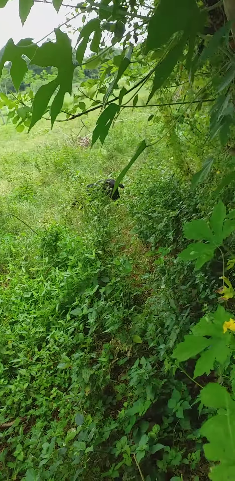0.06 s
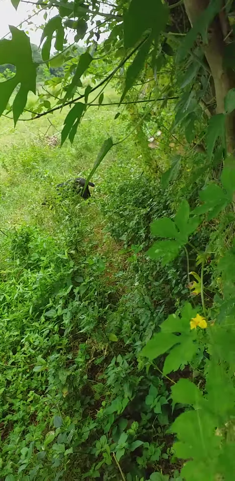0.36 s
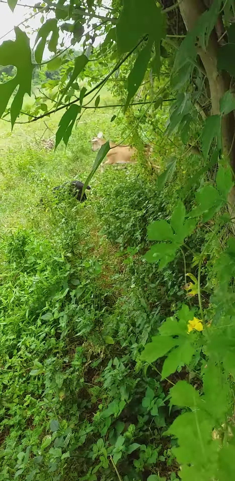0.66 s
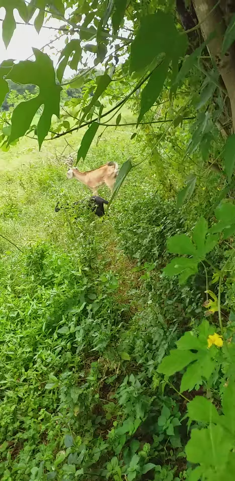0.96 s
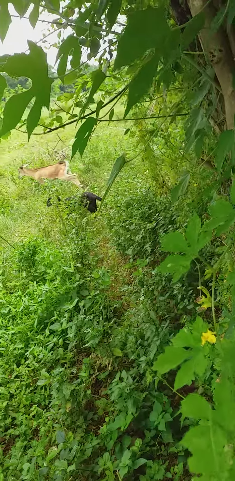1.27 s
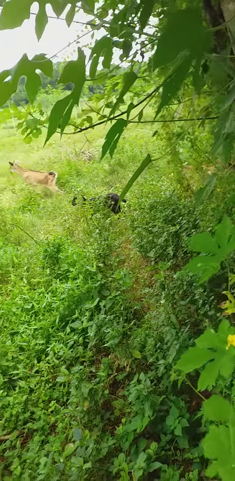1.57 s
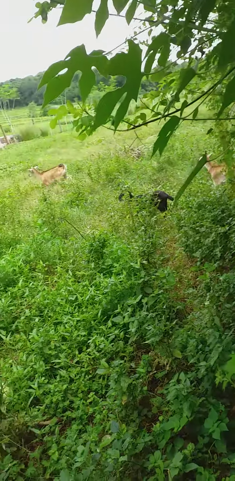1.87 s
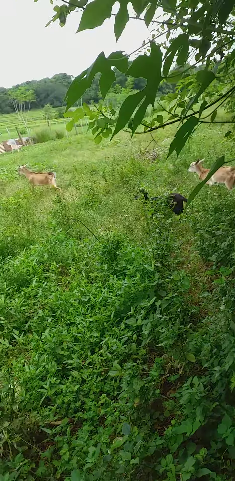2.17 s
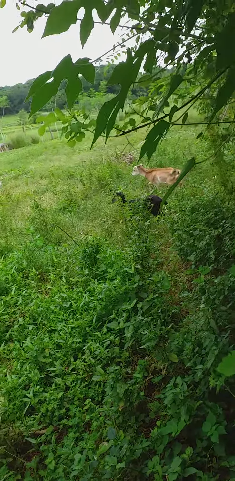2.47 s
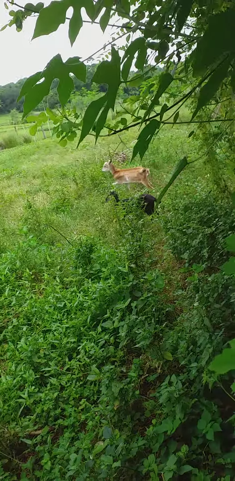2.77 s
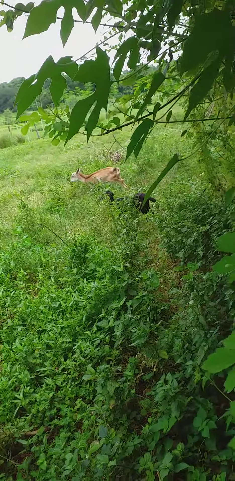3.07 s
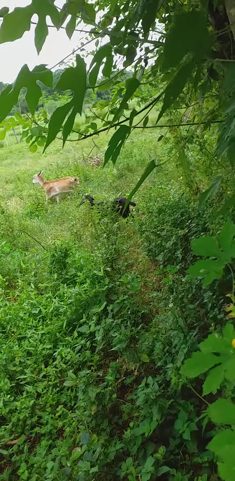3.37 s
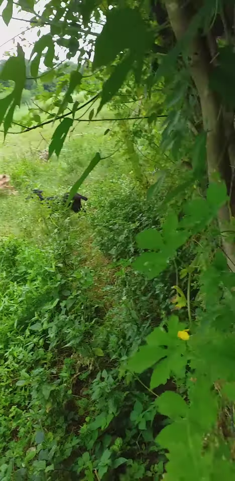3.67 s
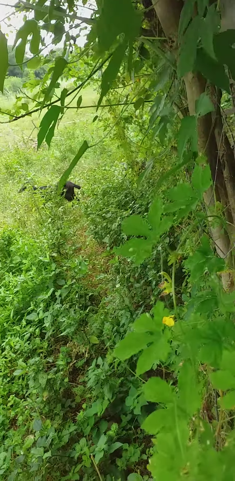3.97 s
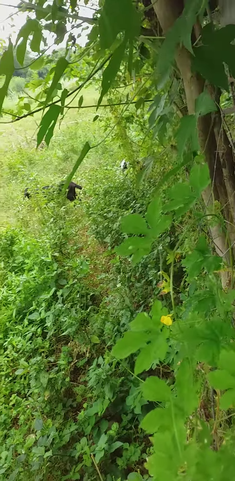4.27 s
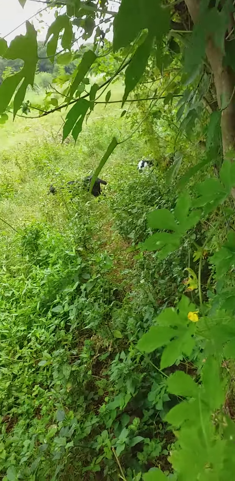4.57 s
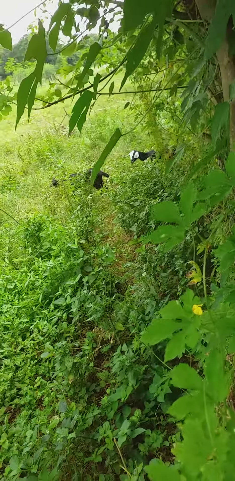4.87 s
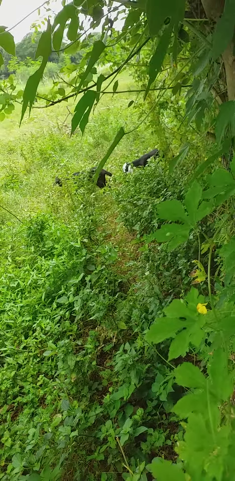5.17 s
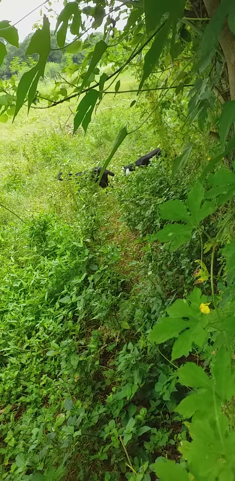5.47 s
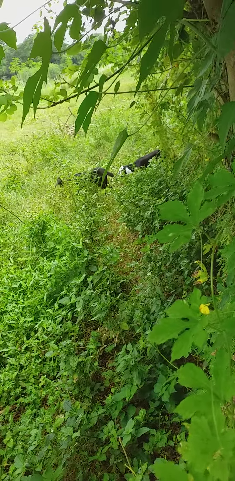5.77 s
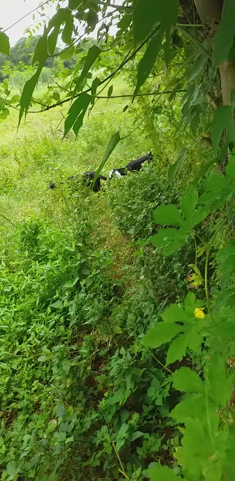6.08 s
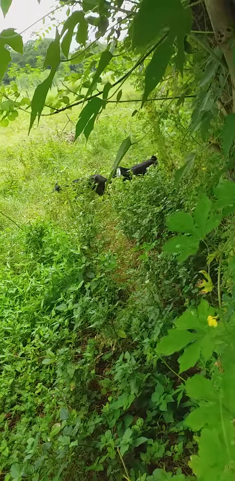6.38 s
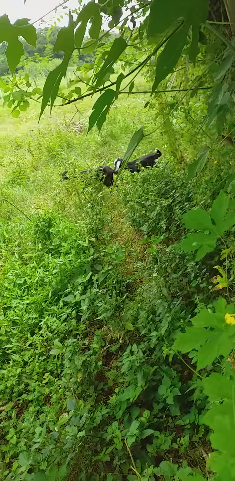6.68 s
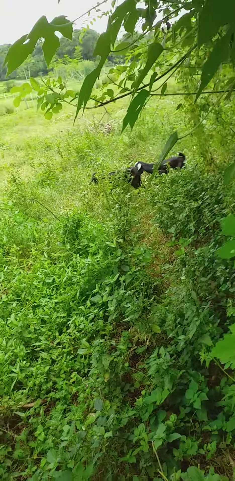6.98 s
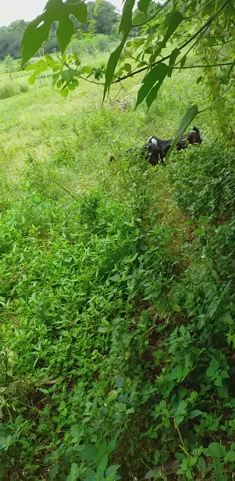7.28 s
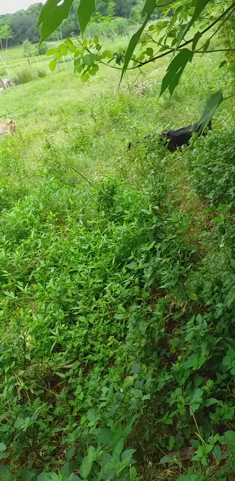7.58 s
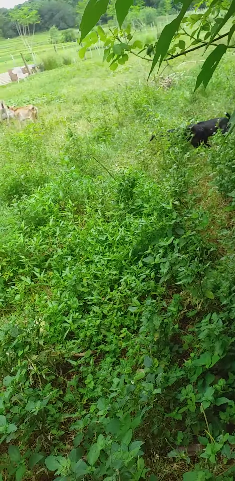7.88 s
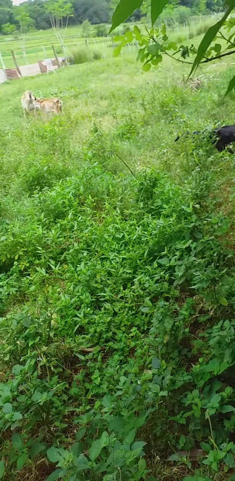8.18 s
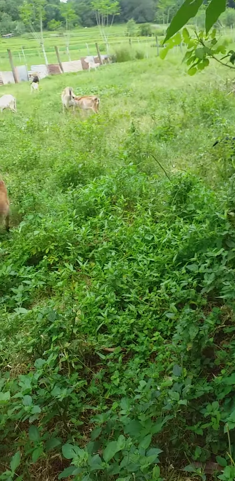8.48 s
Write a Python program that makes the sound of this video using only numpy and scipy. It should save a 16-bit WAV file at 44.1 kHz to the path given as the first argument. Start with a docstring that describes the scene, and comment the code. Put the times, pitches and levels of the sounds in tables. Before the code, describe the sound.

Three wavering bleats from a goat kid, the last one quieter, over soft outdoor air, leaf crackles and faint bird chirps.

```python
"""A pasture opens with low moving air and hissing grass; leaves tick and rustle, puffs bump the microphone.
Small birds chirp, then at 1.4 s a goat kid bleats loudly: its voice box shakes, making about eleven throbs
a second, and trees scatter the sound back. Far animals call thinly from 2.4 s. A second bleat comes at
3.4 s, while a stem knocks on the microphone. Near 6 s the leaves are busiest, and faint insects and a far
hum swell and fade. After one more chirp, a quieter third bleat follows at 7.4 s."""
import sys
import numpy as np
from scipy import signal
from scipy.fft import rfft, irfft, next_fast_len
from scipy.io import wavfile
from scipy.ndimage import map_coordinates

SR = 44100
rng = np.random.default_rng(int(sys.argv[2]) if len(sys.argv) > 2 else 0)


def wav_record(signal):
    """Record a signal, one row per channel, as 16-bit PCM in the file named by sys.argv[1]."""
    frames = np.transpose(np.atleast_2d(signal))
    bounded = np.clip(frames, -1, 1)
    # unit amplitude maps onto the largest positive 16-bit level
    quanta = np.round(bounded * 32767).astype(np.int16)
    wavfile.write(sys.argv[1], SR, quanta)


N = 384672
TIME = np.arange(N) / SR


def amp(db):
    """Turn decibels into a number to multiply by."""
    return 10 ** (np.asarray(db) / 20)


def unit(x):
    """Scale x to an average (rms) size of 1."""
    return x / np.sqrt(np.mean(x ** 2) + 1e-20)


def along(points, hz):
    """Read between (f/Hz, value) points, with octaves evenly spaced."""
    f, v = np.transpose(points)
    return np.interp(np.log(hz + 1), np.log(f + 1), v)


def wobble(rate, size):
    """A smooth curve through `rate` random values a second."""
    knots = rng.standard_normal(int(size * rate / SR) + 4)
    return map_coordinates(knots, [np.arange(size) * rate / SR])


def coloured(x, spectrum):
    """Give x a tone colour: turn its lows and highs up or down by (f/Hz, level/dB) points."""
    m = next_fast_len(len(x) + 8192)
    return irfft(rfft(x, m) * amp(along(spectrum, np.fft.rfftfreq(m, 1 / SR))), m)[:len(x)]


def noise(spectrum, size=N):
    """Noise of average size 1 with the given tone colour."""
    return unit(coloured(rng.standard_normal(size), spectrum))


def add(track, s, x):
    """Mix x into the track from time s."""
    i = max(round(s * SR), 0)
    track[i:i + len(x)] += x[:N - i]


def swell(s, width_s):
    """A bell-shaped rise and fall around time s."""
    return np.exp(-.5 * ((TIME - s) / width_s) ** 2)


def strokes(rows):
    """A loudness curve of quick rises and slower falls, from (peak t/s, level/dB, fall/s) rows."""
    out = np.zeros(N)
    for s, db, fall in rows:
        t = np.arange(max(-2 * fall, -s), 10 * fall, 1 / SR)
        rise = 0.23 * fall
        add(out, s + t[0], amp(db) * np.exp(-np.maximum(-t / rise, t / fall)))
    return out


def whistles(rows, waver):
    """Sliding, slightly unsteady tones that swell and fade."""
    out = np.zeros(N)
    for s, length, start_hz, glide, db in rows:
        u = np.linspace(0, 1, int(length * SR))
        hz = (start_hz + glide * length * u) * (1 + waver * wobble(123, len(u)))
        tone = np.sqrt(2) * np.sin(2 * np.pi * np.cumsum(hz) / SR)
        add(out, s, amp(db) * np.sin(np.pi * u) * tone)
    return out


# Tone colour of moving air: f/Hz, relative level/dB
AIR_COLOUR = [(25, -22.5), (40, -7.5), (60, 1), (120, -1.5), (200, -8), (300, -10), (500, -18), (900, -23),
              (1500, -37.5), (3000, -82)]

def air():
    """Moving air makes a low, uneven rumble."""
    return amp(-58 + 1.9 * wobble(10, N)) * noise(AIR_COLOUR)


# Tone colour of hissing grass: f/Hz, relative level/dB
GRASS_COLOUR = [(300, -24), (800, -12.5), (1100, -2), (1600, 2.5), (3000, 0), (5000, 2), (7500, 1.5),
                (8500, -7), (9600, -14), (10700, -3.5), (11500, 0), (12500, -6), (16000, -5.5)]
# Loudness of the background hiss, which dips after the first bleat and recovers: t/s, relative level/dB
HISS_LEVEL = [(0, -55), (.35, -49.5), (.6, -56.5), (1.3, -53.5), (2.1, -53), (2.6, -59.5), (3.3, -50.5),
              (4.5, -56.5), (5.3, -53.5), (5.8, -56), (7.2, -53.5), (8.2, -50.5)]

def grass():
    """Grass and leaves hiss faintly; a softer stirring drifts in and out on top."""
    drift = amp(4 * wobble(7, N) + 1.5 * wobble(300, N))
    stir_colour = [(1000, -34), (3000, -8.5), (5000, -0.5), (7000, -16.5), (9000, -18.5), (16000, -29)]
    stir = unit(drift * noise(stir_colour))
    level_db = np.interp(TIME, *np.transpose(HISS_LEVEL)) - 2.5 + 0.8 * wobble(8, N)
    return amp(level_db) * (noise(GRASS_COLOUR) + amp(-7) * stir)


# Tone colours of a dry crackle and of a thin leafy hiss: f/Hz, relative level/dB
DRY_LEAF = [(200, -22.5), (1500, -11), (3000, -8.5), (4800, 6), (7200, 1.5), (9300, -19.5),
            (12500, -8), (16000, -18.5)]
THIN_LEAF = [(3000, -24.5), (7000, -5.5), (9300, -16), (12500, -3.5), (16000, -7)]

def stray_ticks():
    """Faint ticks, dry or thin, come at random and crowd together while the leaves are stirred."""
    ticks_per_s = 34 * np.maximum(.15, swell(5.9, width_s=.9))
    dry, thin = (rng.random((2, N)) < ticks_per_s / SR) * amp(rng.uniform(-8, 4, (2, N)))
    return amp(-28) * (coloured(dry, DRY_LEAF) + coloured(thin, THIN_LEAF))


# Puffs of air: t/s, level/dB, width/s
PUFFS = [(0.247, -36, 0.0075), (0.983, -44.5, 0.04), (2.805, -43.5, 0.031), (5.65, -41.5, 0.0047),
         (6.905, -51, 0.038), (7.915, -51.5, 0.058), (8.115, -39.5, 0.026), (8.251, -43, 0.055),
         (8.612, -50, 0.065)]

def air_puffs():
    """Puffs of air hit the microphone's opening and rumble briefly."""
    level = sum(amp(db) * swell(s, width) for s, db, width in PUFFS)
    colour = [(25, -33), (55, 3), (90, 1.5), (150, -6), (260, -25.5), (600, -57), (2000, -90)]
    rumble = signal.hilbert(noise(colour))  # its abs() is the loudness at each moment
    evened = rumble.real / np.sqrt(np.abs(rumble) + .1)
    return level * unit(evened)


# Dry leaves and stems snapping: t/s, peak level/dB
SNAPS = [(0.3, -34), (0.4413, -31.5), (4.89, -27.5), (5.241, -23.5), (5.2645, -31), (5.282, -21.5),
         (5.3515, -25.5), (5.369, -20), (5.614, -33.5), (5.908, -33), (6.1895, -28), (6.5795, -33.5),
         (6.9458, -33), (8.6249, -22.5)]
# Leaves brushing past: peak t/s, level/dB, fall/s, hiss compared with crackle/dB
RUSTLES = [(.32, -57, .1, -9), (.492, -36.5, .012, -13), (2.949, -39, 0.016, -9.5),
           (3.742, -30.5, .035, -12), (4.861, -45, 0.019, -4), (5.028, -49, .07, 3.5),
           (5.189, -41.5, 0.016, -11), (5.39, -46.5, 0.066, -17), (5.984, -45, 0.0067, -14),
           (6.063, -49, 0.0074, 4), (6.192, -47, 0.014, 2), (6.945, -44, 0.032, -24), (8.23, -53, 0.067, 4),
           (8.632, -43, .035, -20)]

def leaves():
    """Brushing leaves make a crowd of tiny crackles and a thin sliding hiss; single stems snap above it."""
    shakes = [(s, db - 30, 0.031) for s, db in SNAPS]  # the leaves shake after each snap
    crackle_level = strokes([(s, db, fall) for s, db, fall, _ in RUSTLES] + shakes)
    hiss_level = strokes([(s, db + hiss_db, fall) for s, db, fall, hiss_db in RUSTLES])
    grains = rng.standard_normal(N) * amp(6 * wobble(1500, N) + 1.2 * wobble(140, N))  # uneven clumps
    out = crackle_level * unit(coloured(grains, DRY_LEAF))
    out += hiss_level * unit(coloured(grains, THIN_LEAF))
    t = np.arange(-.005, .03, 1 / SR)
    crack = (t >= 0) * amp(-60 * np.abs(t) / .015)  # drops 60 dB in 15 ms
    for s, db in SNAPS:
        snap = coloured(rng.standard_normal(len(t)) * crack, DRY_LEAF)
        add(out, s + t[0], amp(db) * snap / np.abs(snap).max())
    return out


# Bird chirps: t/s, starting f/Hz, slide/(Hz per s), level/dB
CHIRPS = [(0.888, 2850, 16000, -55), (1.015, 3400, -16000, -51), (1.084, 2935, 16000, -55.5),
          (1.278, 3026, 11000, -54), (7.033, 3960, -17000, -50)]

def birds(length_s=0.032):
    """Small birds whistle short chirps that slide up or down."""
    return whistles([(s, length_s, hz, glide, db) for s, hz, glide, db in CHIRPS], waver=0.024)


# How long the far trees echo: f/Hz, time to drop 60 dB/s
TREE_FADE = [(300, 0.77), (1500, 0.41), (5000, 0.44), (8000, 0.3664), (14000, 0.83)]

def tree_echoes(x, near_db, near_fade_s, far_db):
    """x with its echoes: quick separate ones off near trunks and bushes, a longer tail off far trees."""
    hz, t, bands = signal.stft(rng.standard_normal(SR), SR, nperseg=256)
    tail = signal.istft(bands * amp(-60 * t / along(TREE_FADE, hz)[:, None]), SR, nperseg=256)[1]
    t = np.arange(len(tail)) / SR
    tail *= 1 - np.exp(-t / 0.041)
    trunks = (rng.random(len(t)) < 500 / SR) * rng.choice([-1, 1], len(t))  # 500 echoes a second
    scatter = trunks * amp(-60 * t / near_fade_s)
    echo = amp(near_db) * scatter / np.linalg.norm(scatter) + amp(far_db) * tail / np.linalg.norm(tail)
    colour = [(500, 6.5), (1100, -4), (1600, 4), (2100, 3), (3500, 4.5), (8000, 2.5)]
    return x + coloured(signal.fftconvolve(x, echo)[:N], colour)


def bleat(throbs, throat, sag, jitter, rough, gap_db, width_s, first_db, second_db, mouth_db,
          mouth_grows, closing_db_per_s, fourth_db, rasp_lag_s, low_width, dull_db, thinning_db_per_s=0):
    """Vocal folds buzz as the voice box shakes: each throb lifts pitch and level, the rasp just behind."""
    s, pitch, rasp_db = np.transpose(throbs)
    t = np.arange(s[0] - .08, s[-1] + 0.0786, 1 / SR)
    effort_db = rasp_db - rasp_db.max()  # 0 at the strongest throb
    closing_db = closing_db_per_s * np.maximum(s - s[rasp_db.argmax()], 0)  # then the mouth closes
    thinning_db = thinning_db_per_s * np.maximum(s - s.mean(), 0)

    def throbbing(db, between_db, lag=0, width=1):
        """A loudness curve with a hump at each throb; the voice carries on weakly in between."""
        distance = np.abs(t - s[:, None] - lag) / (width * width_s)
        humps = np.exp(-.5 * distance ** 2.5)
        fade = np.interp(t, [s[1], s[2], s[-1], t[-1]], [0, 1, 1, 0])
        return np.maximum(amp(db) @ humps, amp(between_db + np.interp(t, s, db)) * fade)

    # the folds go slack between throbs: the pitch sags and the buzz grows uneven
    slack = np.sin(np.pi * np.interp(t, np.r_[t[0], s, t[-1]], np.arange(len(s) + 2))) ** 2
    hz = np.interp(t, s, pitch) * (1 - sag * slack + .01 * wobble(100, len(t)))
    phase = 2 * np.pi * np.cumsum(hz * (1 + jitter * (1 + slack) * wobble(600, len(t)))) / SR
    # harmonics are tones at 1, 2, 3... times the pitch; the lowest two round out the top of a throb
    first = throbbing(first_db + 0.09 * effort_db - closing_db, 2 * gap_db, width=low_width)
    second = throbbing(second_db + 0.69 * effort_db - thinning_db, 2 * gap_db, width=low_width)
    mouth = throbbing(mouth_db + mouth_grows * effort_db - closing_db, 1.5 * gap_db)
    mouth *= amp(1.5 * wobble(120, len(t)))
    low = np.sqrt(2) * (first * np.sin(phase) + second * np.cos(2 * phase))
    low += mouth * unit(np.sin(3 * phase) + amp(fourth_db) * np.cos(4 * phase))
    # each high harmonic swells and fades at random as the throat moves; dull_db above 0 dulls soft throbs
    k = np.arange(5, 31)[:, None]
    softness = 1 - amp(np.interp(t, s, effort_db)) ** .5
    shifting_db = 4.5 * np.array([wobble(45, len(t)) for _ in k])
    gain = amp(along(throat, k * hz) + shifting_db - dull_db * softness * np.log2(k / 10))
    gain /= np.sqrt(np.sum(gain ** 2, 0) / 2)
    buzz = np.sum(gain * np.cos(k * phase + rng.uniform(0, 2 * np.pi, k.shape)), 0)
    buzz *= amp(1.9 * wobble(300, len(t)))
    # breath rushes out once a cycle through the same throat, most at full effort
    puffs = rng.standard_normal(len(t)) * (1 + np.cos(phase))
    puffs = coloured(puffs, [(500, -35.5), (1500, -19.5), (3000, -8.5), (6000, -14)])
    breath = unit(coloured(puffs, throat))
    breath_share = np.clip(rough * (1 + slack) * (1 - softness) ** 2, 0, 1)
    rasp = np.sqrt(1 - breath_share) * buzz + np.sqrt(breath_share) * breath
    out = np.zeros(N)
    add(out, t[0], low + throbbing(rasp_db, gap_db, lag=rasp_lag_s) * rasp)
    return out


# The three bleats, one row a throb: t/s, f/Hz, rasp level/dB
HARSH_THROBS = [(1.378, 349.4, -53), (1.475, 467, -39), (1.55, 491.5, -44.5), (1.592, 516.7, -26),
                (1.664, 550.6, -17), (1.742, 526.7, -13), (1.838, 498.3, -18), (1.926, 517.6, -17)]
ROUND_THROBS = [(3.383, 411.5, -58.5), (3.48, 503, -43), (3.565, 522, -25.5), (3.645, 524.6, -24.5),
                (3.724, 531.2, -23.5), (3.812, 505.6, -25.5), (3.92, 476.8, -32), (4.012, 495.7, -28.5),
                (4.105, 482.5, -29.5)]
QUIET_THROBS = [(7.352, 483, -45.5), (7.428, 524.3, -31), (7.513, 523.2, -26), (7.603, 557.5, -26),
                (7.692, 544.3, -27)]
# Tone colour the throat gives each bleat: f/Hz, relative level/dB
HARSH_THROAT = [(2500, -11), (3100, -4), (3600, -2.5), (4100, -11), (4800, 3.5), (5500, -6.5), (6400, 0.5),
                (7600, -4.5), (8300, -14), (9200, -29), (12500, -25), (16000, -38.5)]
ROUND_THROAT = [(2400, -6.5), (3100, -8.5), (3600, -1), (4200, -3.5), (4900, 6), (5600, -2.5), (6400, 3),
                (7500, 2.5), (8300, -19.5), (9200, -23.5), (12500, -19.5), (16000, -28.5)]
QUIET_THROAT = [(2600, -6.5), (3200, -19), (3800, 1), (4300, -8), (4900, 4), (5700, -8.5), (6500, 2),
                (7500, -8), (8300, -22), (9200, -27.5), (12000, -23.5), (16000, -44)]

def goats():
    """A harsh bleat, a longer and rounder one, and a quieter third that thins as the mouth closes."""
    harsh = bleat(HARSH_THROBS, HARSH_THROAT, sag=.045, jitter=.01, rough=.15, gap_db=-19, width_s=.018,
                  first_db=-48.5, second_db=-35.5, mouth_db=-26.5, mouth_grows=.72, closing_db_per_s=3,
                  fourth_db=-4, rasp_lag_s=.0004, low_width=.83, dull_db=3.5)
    rounder = bleat(ROUND_THROBS, ROUND_THROAT, sag=.025, jitter=.005, rough=.05, gap_db=-17,
                    width_s=.022, first_db=-60.5, second_db=-31, mouth_db=-22, mouth_grows=1.14,
                    closing_db_per_s=1, fourth_db=-14.5, rasp_lag_s=.007, low_width=.61, dull_db=12.5)
    quiet = bleat(QUIET_THROBS, QUIET_THROAT, sag=.02, jitter=.006, rough=.06, gap_db=-11, width_s=.02,
                  first_db=-48, second_db=-41.5, mouth_db=-27, mouth_grows=2.7, closing_db_per_s=48,
                  fourth_db=-17, rasp_lag_s=.0088, low_width=.63, dull_db=-1, thinning_db_per_s=72)
    return harsh + rounder + quiet


# Tones of far animal calls: t/s, length/s, starting f/Hz, slide/(Hz per s), level/dB
FAR_CALLS = [(2.35, .37, 1034, 279.5, -67.5), (2.48, .21, 1415, -600, -68), (2.93, 0.28, 666, -90, -67),
             (3.1, .64, 925, -115, -65), (3.76, 0.23, 631, -2, -66), (4.12, .5, 970, -220, -65.5),
             (5.33, 0.28, 1587, -930, -68.5), (5.56, .11, 2553, 1900, -61.5), (5.57, .13, 3830, 4500, -64)]

def far_animals():
    """Far farm animals call in thin, wavering tones; the last call is a faint bleat with two overtones."""
    return whistles(FAR_CALLS, waver=0.035)


# Knocks of a stem: t/s, level/dB
KNOCKS = [(3.724, -27), (3.741, -30), (3.758, -31.5), (3.79, -34.5)]

def stem_knocks():
    """A stem hits the microphone's case: each time a tiny tap of random pitch and a dull scuff."""
    out, t = np.zeros(N), np.arange(SR // 30) / SR
    for s, db in KNOCKS:
        hz = 329.2 * amp(2 * rng.standard_normal())
        tap = np.sin(2 * np.pi * hz * t) * np.exp(-t / 0.0013)
        scuff = noise([(80, 3), (250, 0), (800, -1.5), (2500, -3.5), (8000, -46.5)], len(t))
        add(out, s, amp(db) * (tap + 0.52 * scuff * np.exp(-t / 0.016)))
    return out


def insects():
    """Insects in the grass make a thin, very high buzz that swells and fades."""
    buzz = noise([(10000, -57.5), (11100, -7), (11400, 3.5), (11750, -3), (13000, -55)])
    return amp(-71.5) * swell(5.9, width_s=1.3) * buzz


def far_hum(peak_s=5.9, rise_db_per_s=22.5, fall_db_per_s=4.5):
    """A faint, wavering hum from far off rises quickly and fades slowly."""
    hz = 196 + 4.86 * wobble(21, N)
    level_db = -61 - np.maximum(rise_db_per_s * (peak_s - TIME), fall_db_per_s * (TIME - peak_s))
    return amp(level_db + 0.89 * wobble(6.2, N)) * np.sin(2 * np.pi * np.cumsum(hz) / SR)


def scene():
    """Mix the echoing animal calls, the sounds close to the microphone and the soft background."""
    calls = tree_echoes(goats(), near_db=-6.5, near_fade_s=.22, far_db=-18)
    calls += tree_echoes(birds(), near_db=-9, near_fade_s=.24, far_db=-12)
    calls += tree_echoes(far_animals(), near_db=0, near_fade_s=.37, far_db=-5)
    close = leaves() + stray_ticks() + air_puffs() + stem_knocks()
    background = air() + grass() + insects() + far_hum()
    return (calls + close + background)[None]


def record(dry):
    """The microphone cuts the deepest bass, rounds off the biggest peaks and drops the highest treble."""
    bottom_hz, top_hz, ceiling = 47, 15950, .92
    lean = signal.sosfilt(signal.butter(5, bottom_hz, "highpass", fs=SR, output="sos"), dry)
    rounded = lean / (1 + np.abs(lean / ceiling) ** 8) ** (1 / 8)
    m = next_fast_len(N + 8192)
    return irfft(rfft(rounded, m) * (np.fft.rfftfreq(m, 1 / SR) < top_hz), m)[..., :N]


dry = scene()
out = record(dry)
wav_record(out)
```